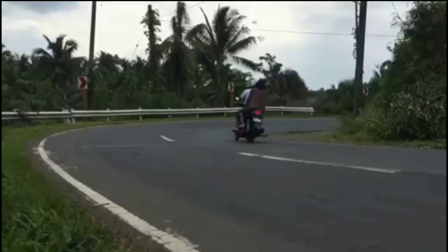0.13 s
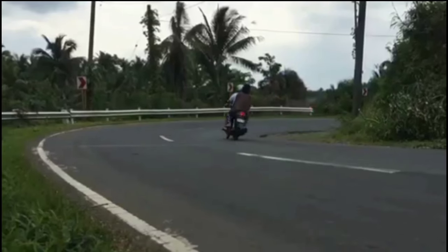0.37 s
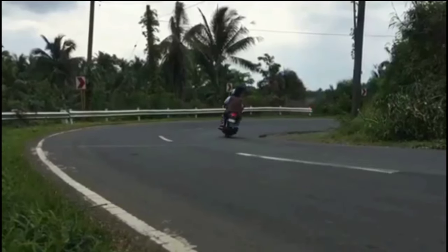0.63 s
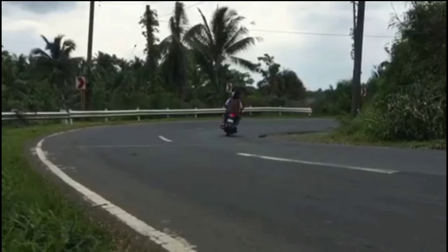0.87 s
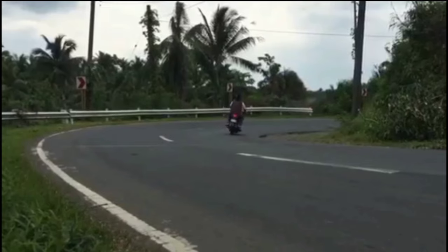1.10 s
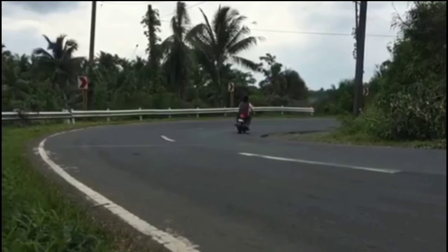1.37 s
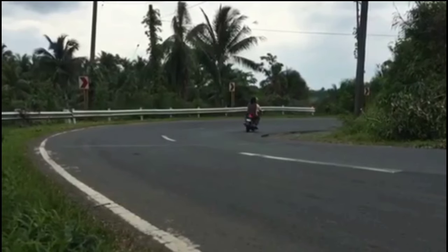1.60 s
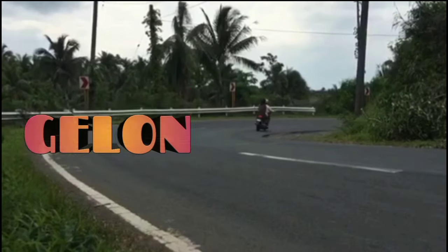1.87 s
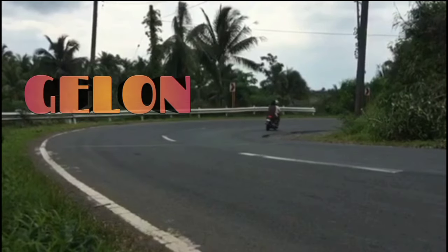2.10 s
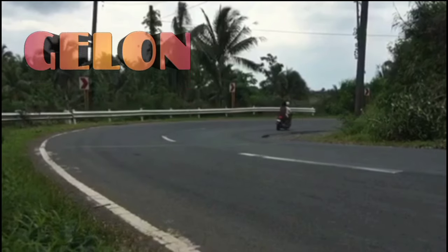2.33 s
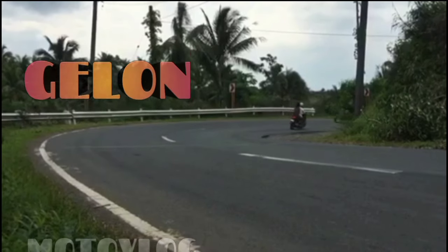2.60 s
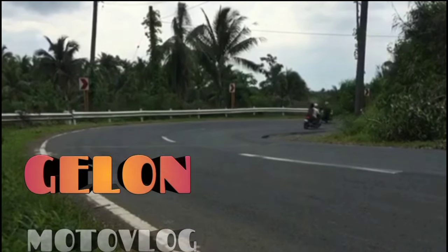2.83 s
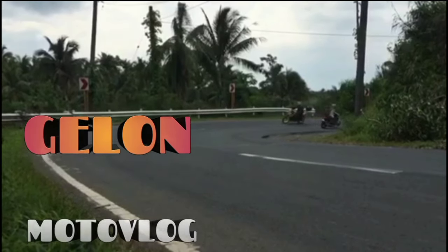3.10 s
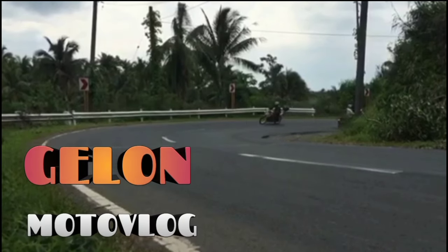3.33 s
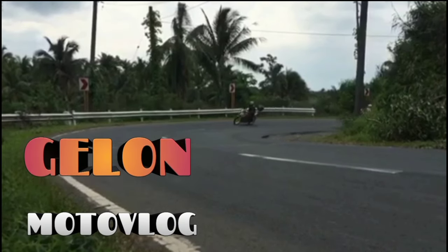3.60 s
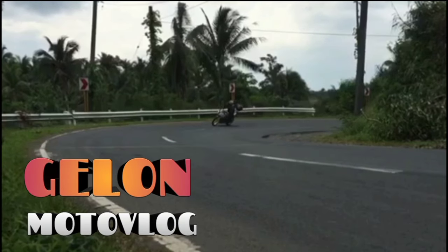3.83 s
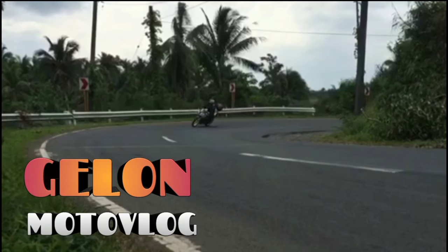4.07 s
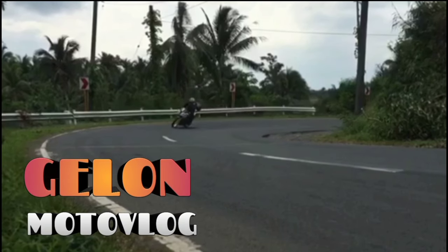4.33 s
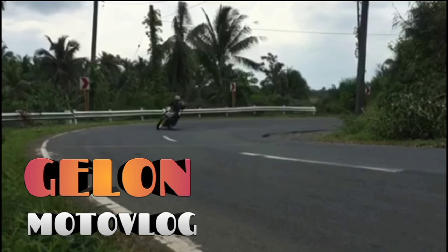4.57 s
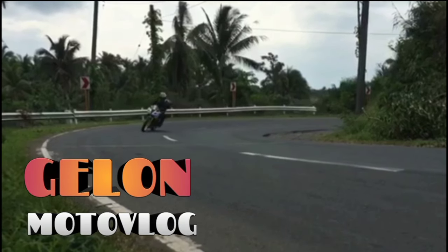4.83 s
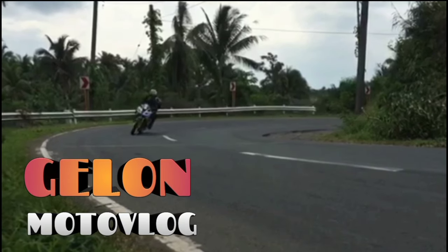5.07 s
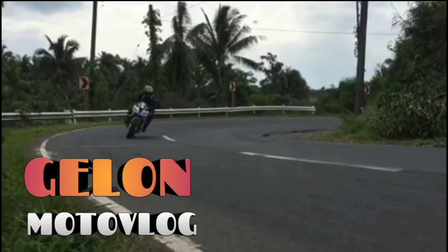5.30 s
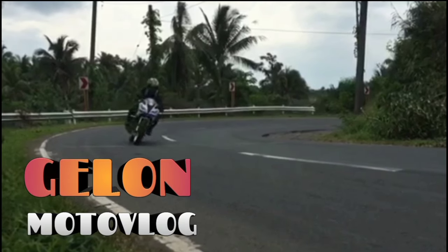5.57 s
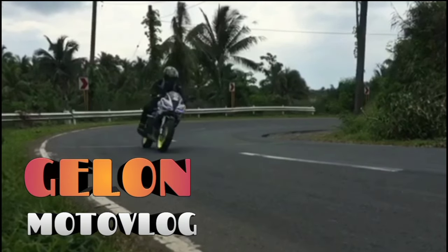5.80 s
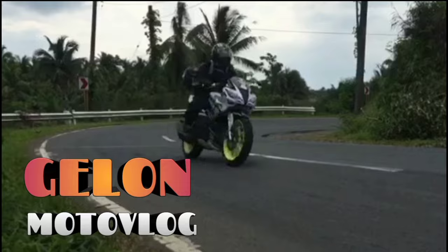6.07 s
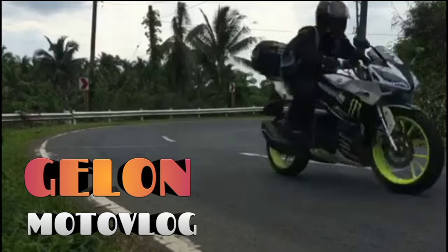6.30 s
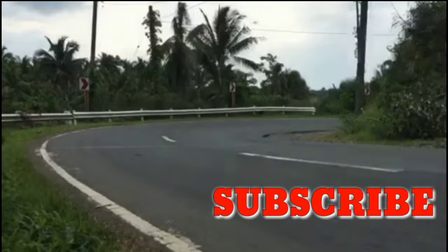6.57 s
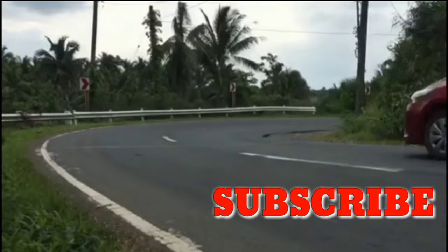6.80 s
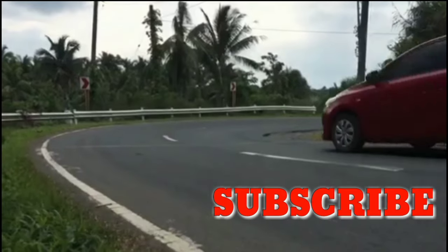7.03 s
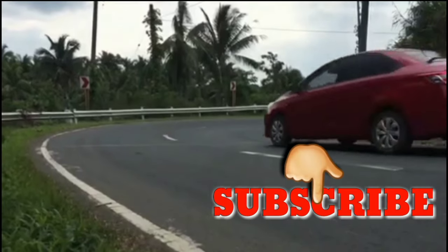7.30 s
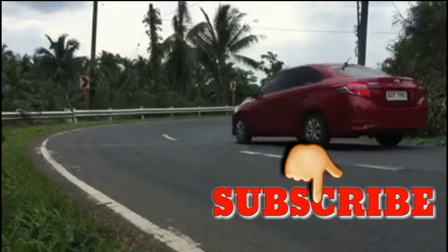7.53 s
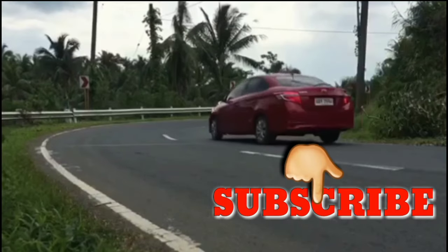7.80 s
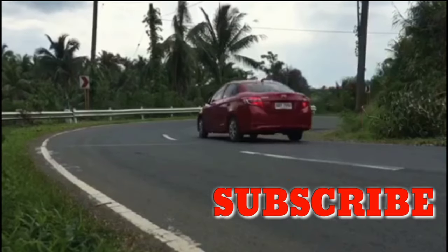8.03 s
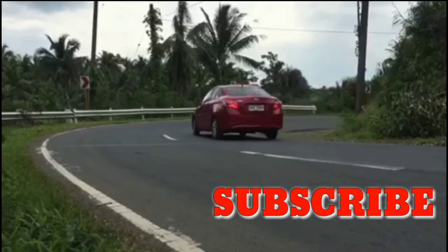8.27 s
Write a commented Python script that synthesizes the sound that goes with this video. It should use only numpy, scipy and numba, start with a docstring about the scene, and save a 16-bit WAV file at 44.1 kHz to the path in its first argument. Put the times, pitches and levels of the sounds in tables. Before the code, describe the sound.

Outdoors at a roadside bend, a coasting scooter thumps unevenly into the distance after the brief tail of a buzzing horn. A single-cylinder motorcycle emerges, droning steadily and growing barkier and louder, then rushes past the fixed microphone. Its throttle closes, the revs sag into lumpy low tailpipe thuds, and it fades to near silence.

```python
"""A single-cylinder motorcycle rounds a country bend at steady throttle, passes the verge close by and rolls
off: pulses at its firing rate ring boom and bark, then, as the revs sink, the tailpipe. Coloured noise makes its rush.
A slightly late echo from the road slides hollow notches through its sound. A scooter coasts away with uneven
exhaust thumps, a few summed tones make a horn that dies out, and narrow noise makes a faint insect.
A low breeze rumbles underneath, stirred once by the motorcycle's wake."""
import sys
import numpy as np
from scipy import signal
from scipy.fft import rfft, irfft, next_fast_len
from scipy.io import wavfile
from scipy.ndimage import uniform_filter1d, map_coordinates
from numba import njit

SR = 44100
rng = np.random.default_rng(int(sys.argv[2]) if len(sys.argv) > 2 else 0)


def undo_db(level):
    """Turn decibels back into plain size, where 20 dB means ten times bigger."""
    steps = np.asarray(level, float) / 20
    return 10 ** steps


def to_wav(sig):
    """Store sig (one row per channel, or 1-D mono) as 16-bit WAV at the path in sys.argv[1].

    Samples outside -1..1 are clipped; the rate is SR.
    """
    pcm = np.clip(np.atleast_2d(sig), -1, 1) * 32767
    pcm = np.round(pcm).astype(np.int16)
    wavfile.write(sys.argv[1], SR, pcm.T)  # frames by channels


N = 370748
T = np.arange(N) / SR  # time in seconds

# The motorcycle heard from the front. Each row: time in seconds, level of the exhaust boom in dB.
FRONT = [(1.3, -71), (1.8, -60), (2.25, -52), (2.46, -38.5), (2.62, -39), (2.94, -44), (3.13, -39),
         (3.35, -37), (4.01, -35), (4.32, -35), (4.82, -30), (5.74, -28.5), (5.95, -29.5), (6.41, -27),
         (6.55, -30), (6.63, -38), (6.66, -51)]


def curves(table):
    """Columns of a table, joined by straight lines in time."""
    s, *columns = np.transpose(table)
    return [np.interp(T, s, c) for c in columns]


def gate(start_s, end_s, fade_s):
    """One between start and end, fading to nothing outside them."""
    return np.clip(np.minimum(T - start_s, end_s - T) / fade_s + 1, 0, 1)


def unit(x):
    """Scale to an average (rms) level of 1."""
    return x / np.sqrt(np.mean(x ** 2))


def ring(x, modes):
    """Resonances side by side, every other one upside down as along a pipe."""
    total = 0
    for k, (hz, width, db) in enumerate(modes):
        b, a = signal.iirpeak(hz, hz / width, SR)
        total = total + (-1) ** k * undo_db(db) * signal.lfilter(b, a, x)
    return total


def even(x, span_s):
    """Divide out the slow loudness, so that the firing rate does not set the level."""
    size = int(span_s * SR)
    power = uniform_filter1d(uniform_filter1d(x ** 2, size), size)
    return x / np.sqrt(power + 1e-12)


def noise(colour):
    """Random hiss shaped by (Hz, dB) points, falling 12 dB per octave below the first."""
    hz, db = np.transpose(colour)
    size = next_fast_len(N)
    f = np.maximum(np.arange(size // 2 + 1) * SR / size, 1)
    octaves_below = np.maximum(np.log2(hz[0] / f), 0)
    shape_db = np.interp(np.log(f), np.log(hz), db) - 12 * octaves_below
    white = rng.standard_normal(size)
    return unit(irfft(rfft(white) * undo_db(shape_db), size)[:N])


def walk(rate):
    """A smooth random wander with rms 1, from about `rate` random levels a second."""
    size = int(SR / rate)
    steps = np.repeat(rng.standard_normal(N // size + 1), size)
    return unit(uniform_filter1d(uniform_filter1d(steps, size), size)[:N])


@njit
def sweep(x, hz, width):
    """A resonance whose pitch can move, with gain 1 at its centre."""
    y, b, l = np.empty(len(x)), 0., 0.
    for i in range(len(x)):
        g, k = np.tan(np.pi * hz[i] / SR), width / hz[i]
        v = (b + g * (x[i] - l)) / (1 + g * (g + k))
        b, l, y[i] = 2 * v - b, l + 2 * g * v, k * v
    return y


def scooter():
    """Coasting engine: gas pushes ring the pipe, some hard, weak ones between, over a low noise drone."""
    # The hard firings. Each row: time in seconds, peak level in dB.
    thump_rows = [(0.003, -33), (0.054, -25), (0.11, -32), (0.164, -36), (0.217, -26.5), (0.275, -30),
                  (0.33, -31.5), (0.384, -34), (0.437, -25), (0.551, -27.5), (0.606, -32), (0.727, -32.5),
                  (0.843, -27), (0.96, -34), (1.08, -30), (1.197, -28), (1.31, -33), (1.497, -36),
                  (1.558, -29.5), (1.679, -30.5), (1.795, -35), (2.014, -35), (2.103, -35), (2.307, -40)]
    # Exhaust pipe resonances. Each row: pitch in Hz, width in Hz, level in dB.
    pipe_modes = [(89, 49, -10.5), (164.3, 42, 14), (320, 51, -7)]
    # Resonances of the drone. Each row: pitch in Hz, width in Hz, level in dB.
    drone_modes = [(82, 34, 0), (138.2, 47, 4.5), (186, 44, 1), (320, 54, -7), (780, 110, -18.5)]
    s, peak_db = np.transpose(thump_rows)
    blows = np.zeros(N)
    blows[(s * SR).astype(int)] = undo_db(peak_db)
    # weak firings fill the gaps at the engine's own pace
    period_s, weak_db, scatter_db = .057, -38.5, 3
    for a, b in zip(s, s[1:]):
        cycles = max(round((b - a) / period_s), 1)
        weak_s = np.linspace(a, b, cycles + 1)[1:-1]
        blows[(weak_s * SR).astype(int)] = undo_db(weak_db + scatter_db * rng.standard_normal(len(weak_s)))
    # a soft push of gas a few ms long
    push = np.hanning(int(0.0068 * SR))
    body = ring(np.convolve(push, np.r_[1, np.zeros(4000)]), pipe_modes)
    thumps = signal.fftconvolve(blows, body / np.abs(body).max())[:N]
    # the drone swells after each firing and dies back over 25 ms
    swelling = signal.fftconvolve(blows > 0, np.exp(-np.arange(4000) / SR / 0.025))[:N]
    puff = swelling + 1.05 + np.clip(T - s[-1], 0, .3)
    drone = unit(ring(puff * rng.standard_normal(N), drone_modes))
    drone_db = -44 - .5 * T + walk(11.08)
    fade = np.clip((6.7 - T) / 0.46 + 1, 0, 1)  # starts to fade at 6.7 s, over 0.46 s
    # its upper note carries only while the tailpipe points this way
    upper = unit(ring(puff * rng.standard_normal(N), [(325, 70, 0)]))
    upper_db = -48.5 - 13 * T
    return thumps + undo_db(upper_db) * upper + fade * undo_db(drone_db) * drone


def horn():
    """The last of a buzzing horn: steady partials, each roughened by a fast random change of strength."""
    # Each row: multiple of the base pitch, level in dB.
    partials = [(6, -5), (7, 2.5), (8, -3), (9, -4.5), (14, -16)]
    base_hz, level_db, hold_s, t60_s = 451.5, -53.5, 0.052, 0.54  # t60: time to fall by 60 dB
    tone = 0
    for k, db in partials:
        roughness = 1 + 0.94 * walk(300)
        tone = tone + undo_db(db) * roughness * np.sin(2 * np.pi * k * base_hz * T)
    return undo_db(level_db - 60 * np.maximum(T - hold_s, 0) / t60_s) * tone


def breeze():
    """Light air on the microphone, a low noise rumble; the bike's wake stirs it, then it dies away."""
    wake_s, wake_half_s = 7.05, 0.18
    wake_db = 11 * np.exp(-((T - wake_s) / wake_half_s) ** 2)
    calm_db = -9 * np.maximum(T - wake_s - wake_half_s, 0)  # 9 dB lost each second
    rumble = noise([(22, -6.5), (40, -5.0), (70, 1.0), (120, -52.0)])
    return undo_db(-59 + wake_db + calm_db + 1.5 * walk(10)) * rumble


def road(x, lag_ms, share):
    """Direct sound plus its grazing bounce off the road, which arrives as a crest and then a trough."""
    def delayed(ms):
        return map_coordinates(x, [np.arange(N) - ms * SR / 1000], order=3, mode="nearest")

    crest, trough = .36 * share, .45 * share
    both = x + crest * delayed(lag_ms - .2) - trough * delayed(lag_ms)
    return unit(both) / np.sqrt(1 + crest ** 2 + trough ** 2)


def road_bounce():
    """Lag in ms and strength of the road echo; moving air and the bike's lean make it come and go."""
    # Each row: time in seconds, lag in ms, strength from 0 to 1, both before the wander below.
    echo_rows = [(0, 1.2, .6), (.35, 1.22, 1), (1.0, 1.13, .9), (1.7, 1.19, .8), (2.1, 1.25, .2),
                 (3.2, 1.38, .2), (3.45, 1.34, .4), (3.75, 1.21, .7), (4.0, 1.14, .75), (4.3, 1.08, 1),
                 (4.65, .99, .8), (5.0, .865, .9), (5.3, .79, .9), (5.9, .77, .7), (6.15, .95, .25),
                 (6.5, 1.25, .15), (8.4, 1.25, .25)]
    lag_ms, share = curves(echo_rows)
    return lag_ms + .012 * walk(9), share * np.clip(1 + .4 * walk(11), 0, 1.4)


def rush(phase, bounce):
    """Tyres, chain and gas: noise as roar, hiss and sizzle, throbbing with each cycle, combed by the road."""
    # Each row: time in seconds, roar level in dB, hiss level in dB, sizzle level in dB.
    rush_rows = [(0.0, -45, -76, -68), (0.13, -49.5, -67, -73.5), (0.4, -51.5, -89, -75),
                 (1.38, -54, -67.5, -69.5), (1.85, -53, -64, -71), (2.05, -54, -62, -65),
                 (2.3, -55.5, -61, -68.5), (2.62, -60, -62.5, -71.5), (2.8, -49, -56.5, -60.5),
                 (2.97, -44, -51, -56), (3.22, -44.5, -54.5, -61), (3.3, -44.5, -46.5, -49.5),
                 (3.6, -40, -46, -47.5), (4.35, -40, -45, -50.5), (5.1, -38.5, -44, -51),
                 (6.01, -37, -41.5, -50.5), (6.48, -35, -36.5, -42), (6.62, -33, -34.5, -42.5),
                 (6.76, -33, -34.5, -40), (6.9, -35.5, -40.5, -44), (7.0, -40.5, -48, -54.5),
                 (7.25, -54, -59.5, -63), (7.51, -56.5, -71, -72.5), (8.4, -71, -100, -92)]
    # Noise colours. Each row: pitch in Hz, strength in dB per Hz.
    roar_colour = [(60, -11), (150, 1), (300, -5), (470, -14), (700, -8), (870, -8), (1040, -6),
                   (1300, -10), (2000, -11), (3000, -23), (5000, -37.5)]
    hiss_colour = [(1500, -4.5), (2500, 2), (3300, 2.5), (4000, 3), (4800, -12), (7000, -15.5)]
    sizzle_colour = [(3500, -7.5), (4300, 2.5), (4900, -0.5), (5500, 1.5), (7000, -4.5), (9000, -9.5),
                     (10000, -42.5)]
    roar_db, hiss_db, sizzle_db = curves(rush_rows)
    throb = np.exp(-phase / 0.39)
    roar = road(noise(roar_colour) * (1 + 0.48 * throb), *bounce)
    hiss = road(noise(hiss_colour) * (1 + 0.47 * throb), *bounce)
    sizzle = road(noise(sizzle_colour) * (1 + 0.34 * throb), *bounce)
    total = undo_db(roar_db + 0.91 * walk(20)) * roar
    total = total + undo_db(hiss_db + 0.79 * walk(10)) * hiss
    return total + undo_db(sizzle_db + 0.79 * walk(12)) * sizzle


def insect():
    """A thin, rough, steady song: noise through one narrow resonance."""
    song = unit(ring(rng.standard_normal(N), [(7460, 50, 0)]))
    return gate(.36, 2.8, fade_s=.3) * undo_db(-89) * song


def revs():
    """Firing rate in Hz: cruising, then a sag towards idle once the throttle shuts."""
    # Firing rate as heard while cruising. Each row: time in seconds, rate in Hz.
    cruise_rows = [(1.0, 44.1), (2.44, 44.47), (2.73, 44.1), (3.27, 44.31), (4.01, 44.45), (4.98, 44.37),
                   (5.16, 44.63), (5.53, 45.92), (5.9, 45.7), (6.44, 46.02), (6.6, 45.46)]
    shut_s, idle_hz, sink_s, sink_shape = 6.6, 16, .68, 1.27
    [hz] = curves(cruise_rows)
    sag = np.exp(-(np.maximum(T - shut_s, 0) / sink_s) ** sink_shape)
    return idle_hz + (hz - idle_hz) * sag


def firings(hz, jitter, scatter_db, limp_db):
    """One pulse a cycle, varying in timing and strength, alternately strong and weak; also the cycle phase."""
    cycles = np.cumsum(hz) / SR
    count = int(cycles[-1])
    chance = rng.standard_normal((count, 2))
    at = np.interp(np.arange(count) + .5 + jitter * chance[:, 0], cycles, np.arange(N))
    index = np.clip(at.astype(int), 0, N - 2)
    size = undo_db(scatter_db[index] * chance[:, 1] + limp_db[index] * (-1.) ** np.arange(count))
    # share each pulse between the two nearest samples
    pulses = np.zeros(N)
    np.add.at(pulses, index, size * (1 - at % 1))
    np.add.at(pulses, index + 1, size * (at % 1))
    return pulses, (cycles + .5) % 1


def smear(x, lags_ms, gain):
    """Echoes from frame and roadside that keep every pitch's strength but spread each pulse in time."""
    for ms in lags_ms:
        poles = np.zeros(int(ms * SR / 1000) + 1)
        poles[[0, -1]] = 1, -gain
        echoes = signal.lfilter(poles[::-1], poles, np.r_[1, np.zeros(6000)])
        x = signal.fftconvolve(x, echoes)[:N]
    return x


def exhaust_boom(pulses, gas):
    """Spread pulses and rough gas ring the low exhaust resonances, each wavering in strength."""
    # Each row: pitch in Hz, width in Hz, level in dB.
    boom_modes = [(95.4, 57.3, -6), (122.7, 60.7, -3), (181.6, 14.2, 1.5), (257, 57, -16)]
    # One row for each resonance. Each row: waver in dB, share of gas noise beside the pulses.
    boom_rough = [(1.4, .006), (1.4, .006), (.9, .005), (1.6, .008)]
    spread = smear(pulses, [3.1, 5.3, 8.9], gain=0.7)
    total = 0
    for k, (mode, (waver_db, share)) in enumerate(zip(boom_modes, boom_rough)):
        total = total + (-1) ** k * undo_db(waver_db * walk(9)) * ring(spread + share * gas, [mode])
    # the two lowest resonances drop out for a moment
    dip = np.exp(-((T - 5.235) / .03) ** 2)
    return even(total - dip * ring(spread, boom_modes[:2]), span_s=.2)


def swell(rows):
    """Gain of one resonance: a faint base that sinks with time, bell-shaped swells, a quick flicker."""
    power = undo_db(-76.5 - 6.5 * (T - FRONT[0][0])) ** 2
    for s, half_s, db in rows:
        power = power + undo_db(db) ** 2 * np.exp(-((T - s) / half_s) ** 2)
    return np.sqrt(power) * undo_db(1.4 * walk(8))


def engine_bark(pulses, gas, bounce):
    """Knocks and gas ring the higher resonances, swelling as the turning bike points each at the verge."""
    # One list for each resonance. Each row: pitch in Hz, width of one pass in Hz, level of one pass in dB.
    bark_modes = [
        [(371.2, 69, 0)],
        [(510.5, 59, 0)],
        [(639.7, 55, 0)],
        [(783.6, 115, 0)],
        [(1071, 50, 0)],
        [(1247, 92, 0)],
        [(712, 43, 0)],
        [(1875, 100, 0)],
        [(1123, 220, 0)],
        [(1306, 130, 0)],
        [(3304, 130, 0)],
    ]
    # One list for each resonance. Each row: swell peak in seconds, half length in seconds, rms level in dB.
    swell_rows = [
        [(1.9, 0.29, -54), (2.5, 0.12, -46), (3.0, 0.21, -40), (3.5, 0.28, -40.5), (4.5, 0.86, -41),
         (5.6, 0.76, -44), (6.3, 0.46, -40), (6.5, 0.11, -34.5)],
        [(4.5, 0.57, -48.5), (5.4, 0.23, -50.5), (6.2, .25, -53)],
        [(2.6, 0.24, -61), (3.45, 0.46, -51), (5.0, 0.52, -41), (5.8, 0.47, -43)],
        [(2.4, 0.43, -62), (3.5, 0.63, -52), (4.9, 1, -49.5), (5.6, 0.43, -48), (6.55, 0.13, -43)],
        [(3.7, 0.16, -61), (4.75, 0.2, -46.5), (5.5, 0.35, -49), (5.95, .15, -49)],
        [(4.2, 0.19, -53.5), (5.1, 0.5, -46.5), (5.9, 0.17, -45)],
        [(2.2, 0.47, -64), (3.5, 0.27, -49.5), (4.9, 0.39, -46)],
        [(1.9, 0.32, -61.5), (3.65, 0.16, -54), (4.05, 0.3, -48), (4.55, .25, -52), (5.0, 0.28, -49.5),
         (5.85, 0.28, -47.5), (6.55, 0.17, -49.5)],
        [(3.0, 0.14, -57), (6.08, .12, -44), (6.22, .1, -38), (6.35, 0.11, -35), (6.48, .08, -37.5)],
        [(6.08, .1, -43), (6.27, .13, -41)],
        [(5.41, 0.78, -55.5)],
    ]
    # One number for each resonance: gas noise beside the pulses, as an rms ratio.
    gas_shares = [.27, .3, .25, .45, .2, .2, .4, 1.3, .1, .14, 1]
    # One number for each resonance: share from 0 to 1 that arrives bare, without reflections.
    bare_shares = [0, 0, 0, 0, .9, .9, 0, .9, .05, 1, .8]
    # close reflections thicken each knock
    knocks = road(smear(pulses, [1.7, 2.9, 4.7], gain=0.28), *bounce)
    puffs = road(gas, *bounce)
    total = 0
    for k, (rows, share, bare, modes) in enumerate(zip(swell_rows, gas_shares, bare_shares, bark_modes)):
        direct = unit(pulses + .05 * share * gas)
        reflected = knocks + share * puffs
        rung = ring(ring(bare * direct + (1 - bare) * reflected, modes), modes)
        # every other resonance in the list is upside down; opposed neighbours leave hollows between them
        total = total + (-1) ** k * swell(rows) * unit(rung)
    return total


def tailpipe(drive, pipe_hz, modes):
    """Steep pipe resonances that follow the pipe pitch; neighbours oppose, leaving dark gaps."""
    total = 0
    for n, (k, width, db) in enumerate(modes):
        hz = k * pipe_hz
        rung = sweep(sweep(drive, hz, 1. * width), hz, 1. * width)
        total = total + (-1) ** n * undo_db(db) * rung
    return even(total, span_s=0.14)


def motorcycle(bounce):
    """Even firings under load ring boom and bark; off throttle, lumpier ones ring the tailpipe."""
    # Heard from behind. Each row: time in seconds, thud level in dB, rasp level in dB, pipe pitch in Hz.
    rear_rows = [(6.67, -27.5, -39, 153), (6.746, -26, -31, 151), (6.9, -28, -35.5, 145.7),
                 (7.086, -30, -40, 137.2), (7.3, -36.5, -48, 138), (7.5, -43.5, -57.5, 139.6),
                 (7.85, -52, -63.5, 145), (8.4, -62.5, -75, 138.4)]
    # A list for the thud, then one for the rasp.
    # Each row: multiple of the pipe pitch, width of one pass in Hz, level in dB.
    pipe_parts = [(.66, 60.3, -3.5), (1.05, 34.5, 7)], [(2.08, 51.8, 9.5), (4.4, 170, -8),
                  (7.1, 118.6, -21.5)]
    hz = revs() * (1 + .0025 * walk(7))  # the rate wavers
    [boom_db] = curves(FRONT)
    thud_db, rasp_db, pipe_hz = curves(rear_rows)
    # slow firing is lumpier and limps
    scatter_db = np.interp(hz, [22, 36], [1.4, .7])
    limp_db = np.interp(hz, [28, 34], [-2.0, 0])
    pulses, phase = firings(hz, jitter=.002, scatter_db=scatter_db, limp_db=limp_db)
    # escaping gas roughens every pulse
    gas = np.exp(-phase / 6.7) * rng.standard_normal(N)
    front = undo_db(boom_db) * exhaust_boom(pulses, gas) + engine_bark(pulses, gas, bounce)
    # slower firing leaves more of the cycle to the gas
    gas_share = np.interp(hz, [18, 36], [.021, .007])
    drive = smear(pulses, [2.3, 3.7], gain=.45) + gas_share * gas
    thud = undo_db(thud_db) * tailpipe(drive, pipe_hz, pipe_parts[0])
    rasp = undo_db(rasp_db) * tailpipe(drive, pipe_hz, pipe_parts[1])
    front_gate = gate(FRONT[0][0], FRONT[-1][0], fade_s=0.026)
    rear_gate = gate(rear_rows[0][0], rear_rows[-1][0], fade_s=0.021)
    return front_gate * front + rear_gate * (thud + rasp), phase


def hollow_out(bike):
    """Take away a narrow moving band, where reflections cancel."""
    # Each row: time in seconds, pitch in Hz, depth from 0 to 1 before the wander below.
    hollow_rows = [(2.0, 470, 0), (2.3, 470, .7), (2.95, 500, .7), (3.25, 540, .8), (3.7, 560, 0),
                   (4.35, 945, 0), (4.6, 945, .85), (5.7, 960, .85), (6.15, 950, .8), (6.28, 915, .7),
                   (6.36, 900, 0)]
    hollow_hz, depth = curves(hollow_rows)
    depth = np.clip(depth * (1 + .15 * walk(3.4)), 0, 1)
    return bike - depth * sweep(bike, hollow_hz, 100.)  # band 100 Hz wide


def scene():
    """All sources at one microphone."""
    bounce = road_bounce()
    engine, phase = motorcycle(bounce)
    bike = hollow_out(engine + rush(phase, bounce))
    return (bike + scooter() + horn() + insect() + breeze())[None]


def top_cut(x):
    """Nothing passes above the cut-off."""
    return signal.sosfilt(signal.butter(12, 9260, fs=SR, output="sos"), x)


def record(dry):
    """The microphone loses the deep bass and stops short in the treble."""
    no_deep_bass = signal.butter(2, 55, "high", fs=SR, output="sos")
    treble_stop = signal.ellip(10, .3, 75, 9020, fs=SR, output="sos")  # passes up to 9020 Hz
    mix = signal.sosfilt(treble_stop, signal.sosfilt(no_deep_bass, dry))
    return top_cut(mix)


dry = scene()
out = record(dry)
to_wav(out)
```